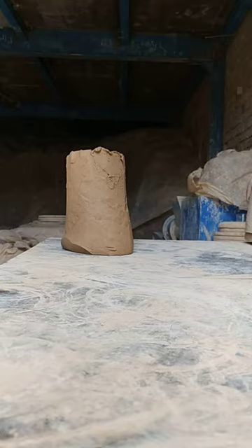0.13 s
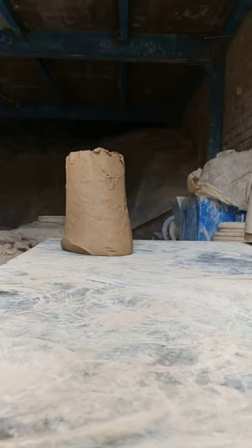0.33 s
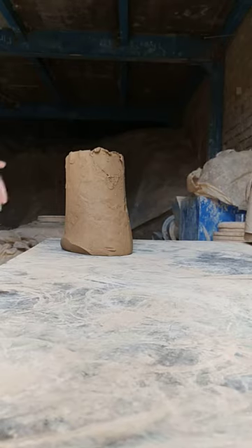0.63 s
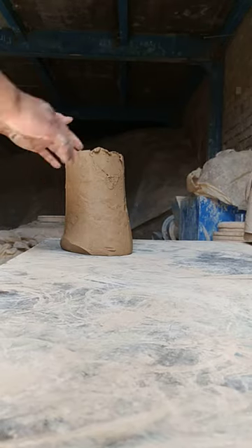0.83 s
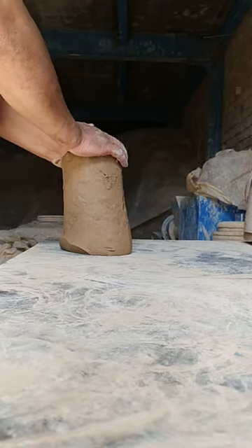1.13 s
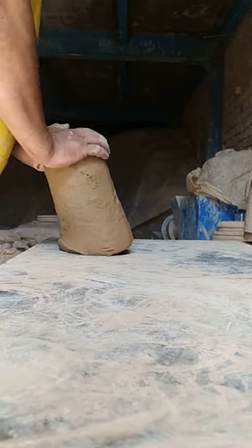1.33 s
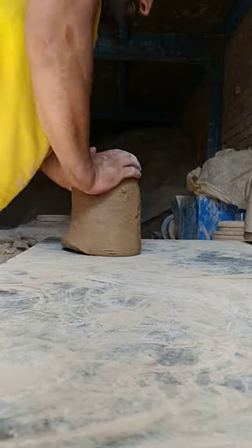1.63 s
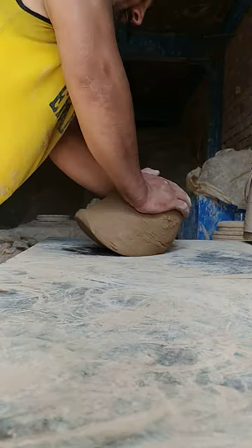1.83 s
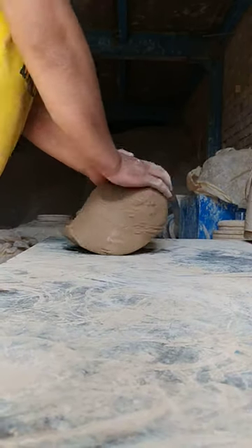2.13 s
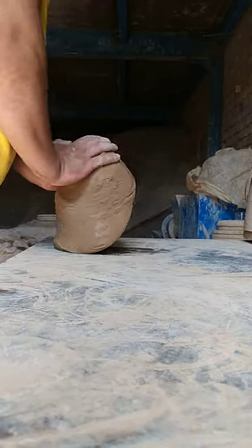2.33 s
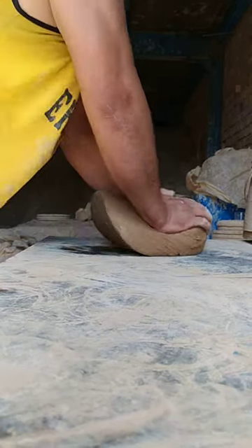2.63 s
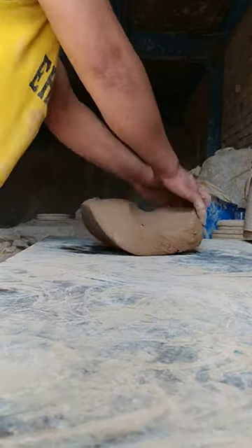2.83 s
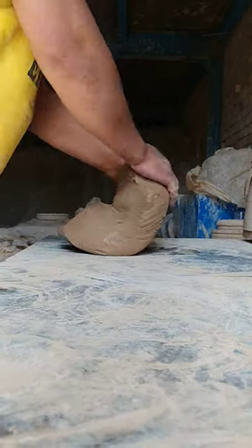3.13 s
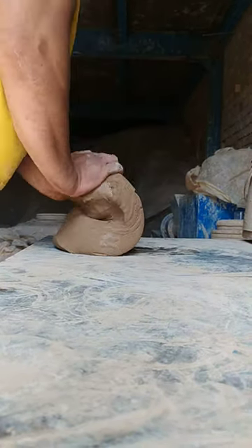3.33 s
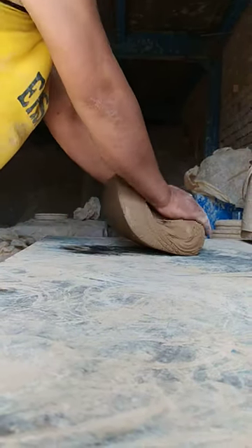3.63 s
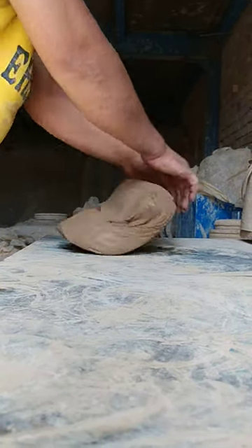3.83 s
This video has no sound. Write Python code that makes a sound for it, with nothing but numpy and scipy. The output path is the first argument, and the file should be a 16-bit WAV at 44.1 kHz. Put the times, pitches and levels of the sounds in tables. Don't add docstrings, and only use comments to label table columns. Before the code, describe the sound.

Clay being worked by hand on a table, close to a phone. Silence until 0.35 s, then a distant motor fan's low rumble, airy hiss and faint wavering tones. Soft pats at 0.9 and 1.2 s; swishes and sticky ticks around 1.8-2.2, a longer rub at 2.5-2.7, a crisp tick at 2.9. Firm snaps at 3.2, faint touches after, a last slap near 4.0. Short blurred workshop echo.

```python
import sys
import numpy as np
from scipy import signal
from scipy.fft import rfft, irfft
from scipy.io import wavfile
from scipy.ndimage import uniform_filter1d

SR = 44100
rng = np.random.default_rng(int(sys.argv[2]) if len(sys.argv) > 2 else 0)


def bounce(signal):
    frames = np.transpose(np.atleast_2d(signal))
    limited = np.clip(frames, -1, 1)
    pcm = np.round(limited * 32767).astype(np.int16)
    wavfile.write(sys.argv[1], SR, pcm)


def volts(x):
    e = np.asarray(x, float) / 20
    return 10 ** e


N = 176400


def evened(x):
    return x / np.sqrt(np.mean(x ** 2) + 1e-20)


def read(points, hz):
    f, value = np.transpose(points)
    return np.interp(np.log(hz + 1), np.log(f + 1), value)


def add(mix, start_s, sound, left_minus_right_db):
    part = mix[:, round(start_s * SR):][:, :sound.shape[-1]]
    sides = volts(np.array([[.5], [-.5]]) * left_minus_right_db)
    part += (sound * sides)[:, :part.shape[1]]


def colour(x, hz, octaves):
    port_hz, port_width_hz, port_db = 9100, 2000, 6
    roll_hz, roll_db_per_octave = 9600, -18
    f = np.fft.rfftfreq(x.shape[-1], 1 / SR) + 1
    bell = -6 * (np.log2(f / hz) / octaves) ** 2
    port = port_db / (1 + (2 * (f - port_hz) / port_width_hz) ** 2)
    roll = roll_db_per_octave * np.maximum(np.log2(f / roll_hz), 0)
    return irfft(rfft(x) * volts(bell + port + roll), x.shape[-1])


def fan():
    # pitch_hz, level_db (per Hz)
    rumble = [(12, -48), (20, -13.5), (54, -11), (81, -12), (166, -5.5), (425, -17.5), (466, -12),
              (588, -24), (800, -27), (1040, -61), (1760, -120)]
    hiss = [(350, -33), (600, -4.5), (1080, -4), (2210, -13), (2830, -9), (3520, -15), (6400, -19),
            (8510, -16.5), (15500, -30.5)]
    # pitch_hz, likeness (0 to 1)
    likeness = [(25, 0.76), (60, 0.94), (180, 0.9), (550, 0.45), (1650, 0.12), (4970, 0.0068), (15000, 0.0)]
    # pitch_hz, left_minus_right_db
    balance = [(60, 5.5), (130, -4.5), (290, 1), (640, 1), (1410, 3.5), (3100, -1), (6820, 0), (15000, 0.5)]
    # pitch_hz, width_hz, level_db, left_minus_right_db
    shed_modes = [(53, 32, -60.5, -3), (116, 11.5, -55, -5.5), (153.7, 16, -57.5, 11), (172, 14, -52.5, -8),
                  (211.4, 20, -60, 10.5), (230, 4, -63.5, 6.5), (327, 39, -73.5, -20),
                  (374.6, 36, -61, -3.5), (469.2, 10, -56.5, -2.5), (534, 49, -65, 3)]
    # pitch_hz, then for each width_hz, level_db, left_minus_right_db
    casing_hz = [1090, 2026, 2666, 2828, 2914, 3291, 4850, 4983, 8409, 8500]
    casing = [(110, -69, 1.5), (37, -80, -11.5), (24.7, -83, 15.5), (30, -70.5, 3.5), (40.3, -72, -1),
              (30, -77, 7.5), (370, -72.5, -1), (25, -81, -10), (30, -88.5, -35.5), (895, -72.5, -12)]
    # time_s, level_db
    load = [(.35, -1), (.9, -1), (1.3, 0), (2.4, 0), (3.3, 0), (3.7, 1), (4, 1)]
    rumble_db, hiss_db, split_hz = -42.5 - 3.5, -57 - 1.5, 700
    patch_db, waver_db, swell_db = 0.75, 2, .3
    size, hop = 4096, 1024
    frames, hz = N // hop + 5, np.fft.rfftfreq(size, 1 / SR)
    tones = shed_modes + [(f, *row) for f, row in zip(casing_hz, casing)]

    a, b, c, d, patches = rng.standard_normal((frames, len(hz), 5)).T
    patches = uniform_filter1d(patches, size=30, axis=0)
    patches = evened(uniform_filter1d(patches, size=4, axis=1))
    slow = rng.standard_normal((frames, len(tones) + 1))
    slow = uniform_filter1d(slow, size=6, axis=0).T * np.sqrt(6)

    low = volts(read(rumble, hz)) ** 2 * (hz < split_hz)
    high = volts(read(hiss, hz)) ** 2 * (hz >= split_hz)
    wash = low / low.sum() * volts(rumble_db) ** 2 + high / high.sum() * volts(hiss_db) ** 2
    wash = wash * volts(np.array([[1], [-1]]) * read(balance, hz))
    power = wash[:, :, None] * np.ones(frames)
    for (f, width, db, pan_db), waver in zip(tones, slow):
        line = 1 / (1 + (2 * (hz - f) / width) ** 2) ** 2
        line = (line / line.sum())[:, None] * volts(db + waver_db * waver) ** 2
        power = power + volts([[[pan_db]], [[-pan_db]]]) * line

    same = np.clip(read(likeness, hz), -1, 1)[:, None]
    left = a + 1j * b
    z = np.array([left, same * left + np.sqrt(1 - same ** 2) * (c + 1j * d)])
    plain = signal.istft(left, nperseg=size, noverlap=size - hop)[1]
    scale = np.sqrt(len(hz)) / np.std(plain)
    z *= np.sqrt(power) * volts(patch_db * patches + swell_db * slow[-1])
    load_db = np.interp(np.arange(frames) * hop / SR, *np.transpose(load))
    z *= volts((hz >= split_hz)[:, None] * load_db)
    return scale * signal.istft(z, nperseg=size, noverlap=size - hop)[1][:, :N]


def lean(length_s, db, hz):
    t = np.arange(round(length_s * SR)) / SR
    return volts(db + 1.5) * np.sin(np.pi * t / length_s) * np.sin(2 * np.pi * (hz * t + rng.random()))


def leans(air):
    # start_s, length_s, level_db, pitch_hz
    weights = [
        (.4, 0.094, -48, 52),
        (1.4, 0.22, -50, 48),
        (1.44, 0.24, -44, 172),
        (2.0, 0.17, -44.5, 178.3),
        (3.9, .08, -43, 158.2),
        (3.43, .15, -48, 176),
        (1.58, .12, -48, 150),
        (.39, .1, -50, 125),
    ]
    for start_s, length_s, db, hz in weights:
        add(air, start_s, lean(length_s, db, hz), 0)


def shed(x):
    t60_s, build_s = 0.26, 0.021
    t = np.arange(SR // 3) / SR
    tail = rng.standard_normal((2, len(t))) * volts(-60 * t / t60_s) * np.minimum(t / build_s, 1) ** 2
    return signal.fftconvolve(x, tail / np.linalg.norm(tail[0]), axes=1)[:, :N]


def tick(db, hz, octaves, cycles, tail_db):
    burst_s, tail_s = 0.00015, 0.0069
    t = np.arange(4096) / SR
    noise = rng.standard_normal((3, len(t)))
    burst = evened(colour(noise[:2] + .5 * noise[2], hz, octaves))
    shape = np.exp(-t / (burst_s + cycles / hz)) + volts(tail_db) * np.exp(-t / tail_s)
    snap = np.minimum(t * hz / 3, 1) * shape * burst
    return volts(db) * snap / abs(snap).max(axis=1)[:, None]


def skin_ticks(hands):
    # start_s, peak_db, centre_hz, width_octaves, left_minus_right_db
    ticks = [(0.902, -39, 5000, 4.1, 9), (1.17, -45.5, 3970, 1.5, 3), (1.203, -47.5, 1170, 0.51, 8),
             (1.8, -46, 3530, 2.3, 7), (1.9497, -50, 5000, 1.4, 11), (2.0325, -40.5, 4170, 1.3, 9.5),
             (2.0365, -39.5, 3600, 0.86, 9), (2.193, -43.5, 1190, 0.43, 3), (2.2167, -44.5, 7000, 1.1, 9),
             (2.5574, -50, 4340, 0.76, 8), (2.596, -44.5, 2310, 0.55, 12), (2.8751, -32, 9550, 0.82, 0.5),
             (2.877, -39.5, 3020, 1.16, 8.5), (2.8753, -51, 14500, .2, 1), (.902, -57, 13500, .2, 4),
             (3.188, -49, 13500, 0.28, -6), (3.21, -49, 13500, .2, -3)]
    for start_s, db, hz, octaves, pan_db in ticks:
        add(hands, start_s, tick(db, hz, octaves, cycles=1.2, tail_db=-19.5), pan_db)


def slaps(hands):
    # start_s, peak_db, centre_hz, width_octaves, left_minus_right_db
    hits = [(3.1862, -38, 7100, 0.26, -13), (3.187, -44, 6850, 0.44, -12), (3.1883, -31.5, 6800, 0.4, -12),
            (3.1885, -39, 5000, 0.35, -6), (3.187, -40.5, 1160, 0.76, -8), (3.208, -47, 1790, 0.56, -8),
            (3.2085, -39, 8900, 1, -8), (3.2125, -39, 9100, 0.6, 1), (3.234, -46, 8500, 2, -15),
            (3.237, -46, 9100, .5, -16), (3.4694, -44.5, 6500, 0.51, -5), (3.7608, -49.5, 1930, 0.29, -22),
            (3.9905, -42, 8000, 0.41, -11), (3.991, -35.5, 1340, 0.88, -5),
            (3.9958, -36.5, 8140, 0.18, -17), (3.997, -29.5, 2410, 1.9, -8)]
    for start_s, db, hz, octaves, pan_db in hits:
        add(hands, start_s, tick(db, hz, octaves, cycles=1.1, tail_db=-33), pan_db)


def stroke(length_s, db, hz, octaves):
    grit_db, grit_per_s, lump_db, mottle_db = .7, 10000, 1, 1.8
    skew, softness = 0.6, 1.07
    u = np.arange(round(length_s * SR)) / (length_s * SR)
    chance = rng.standard_normal((4, 8192))
    strength = volts(grit_db * np.minimum(-np.log(chance[2] % 1 + 1e-9), 5))
    slips = chance[:2] * strength * (chance[3] % 1 < grit_per_s / SR)
    lumps = volts(lump_db * evened(uniform_filter1d(chance[3], size=700)))
    z = signal.stft(colour(slips + 0.047 * slips[::-1], hz, octaves), nperseg=256)[2]
    spots = uniform_filter1d(rng.standard_normal(z.shape[1:]), size=9, axis=0)
    spots = evened(uniform_filter1d(spots, size=4, axis=1))
    rub = evened(signal.istft(z * volts(mottle_db * spots), nperseg=256)[1])
    rub = (rub * lumps)[:, :len(u)]
    return volts(db + 5) * abs(np.sin(np.pi * u ** skew)) ** softness * rub


def rub_all(hands, table, octaves):
    for start_s, length_s, db, hz, pan_db in table:
        add(hands, start_s, stroke(length_s, db, hz, octaves), pan_db)


def fingertip_rubs(hands):
    # start_s, length_s, level_db, centre_hz, left_minus_right_db
    rubs = [
        (3.62, 0.12, -67.5, 6040, -2),
        (3.61, 0.15, -67.5, 8700, -3.5),
        (1.825, .06, -61.5, 7150, 4),
        (2.1, 0.044, -65, 3700, 5),
        (2.55, 0.027, -65.5, 4350, 8),
    ]
    rub_all(hands, rubs, octaves=.2)


def squeezes(hands):
    # start_s, length_s, level_db, centre_hz, left_minus_right_db
    presses = [
        (.9, 0.11, -65, 1700, 4),
        (1.16, 0.083, -62.5, 1100, 1),
        (2.57, 0.091, -64, 2800, 1),
        (3.184, 0.08, -61, 1200, 0),
        (3.752, 0.04, -61.5, 1840, -3),
        (2.58, .04, -60, 1500, 10),
        (3.205, 0.051, -62.5, 1550, 4),
        (1.798, .022, -62.5, 3100, 4),
    ]
    rub_all(hands, presses, octaves=.45)


def palm_strokes(hands):
    # start_s, length_s, level_db, centre_hz, left_minus_right_db
    strokes = [(0.905, 0.085, -64, 5600, 5), (1.165, 0.073, -67.5, 6100, -2), (1.797, 0.042, -63, 4400, 7),
               (1.815, 0.088, -59, 6460, 2), (1.944, 0.075, -61.5, 5500, 6.5), (2.027, 0.029, -61, 3900, 7),
               (1.84, .05, -67, 2600, 1), (1.99, 0.07, -68, 4400, 9), (2.208, 0.03, -62, 7400, -1),
               (2.515, .175, -61, 2680, 5.5), (2.538, 0.17, -64, 7940, 4), (2.61, .15, -65, 3500, 1),
               (2.88, 0.078, -63, 8100, -7), (3.211, 0.084, -65.5, 8500, 7), (3.991, 0.025, -71, 4960, -3)]
    rub_all(hands, strokes, octaves=1)


def thin_out(x):
    # pitch_hz, threshold_db
    threshold = [(1000, -36), (1900, -17), (2800, -22), (3700, -9), (4900, -16), (6200, -2), (7400, -10),
                 (8600, -27), (10800, 5), (14000, 4), (14800, 28)]
    jitter_db = 8.5
    n, k = np.arange(2048), np.arange(728)
    waves = np.cos(np.pi / 1024 * np.outer(n + 512.5, k + .5))
    basis = np.sin(np.pi * (n + .5) / 2048)[:, None] * waves / np.sqrt(512)
    mid_side = np.array([[1, 1], [1, -1]]) / np.sqrt(2)
    blocks = np.pad(mid_side @ x, ((0, 0), (1024, 2048 - N % 1024))).reshape(2, -1, 1024)
    c = np.concatenate([blocks[:, :-1], blocks[:, 1:]], axis=2) @ basis
    usual = uniform_filter1d(np.median(c ** 2, axis=1), size=32, axis=1)
    usual = np.sqrt(usual * 2.2)[:, None]
    wander = uniform_filter1d(rng.standard_normal((2, c.shape[1], 73)), size=4, axis=1)
    wander = evened(wander).repeat(10, axis=2)[..., :728]
    limit = usual * volts(read(threshold, k * SR / 2048) + jitter_db * wander)
    back = (c * (abs(c) > limit)) @ basis.T
    return mid_side @ (back[:, :-1, 1024:] + back[:, 1:, :1024]).reshape(2, -1)[:, :N]


def scene():
    air, hands = fan(), np.zeros((2, N))
    leans(air)
    skin_ticks(hands)
    slaps(hands)
    fingertip_rubs(hands)
    squeezes(hands)
    palm_strokes(hands)
    return air + hands + volts(-11) * shed(hands)


def top_cut(x):
    return signal.sosfilt(signal.butter(12, 15640, fs=SR, output="sos"), x)


def record(dry):
    open_s, open_db, rise_s = .35, -10, .035
    t = np.arange(N) / SR - open_s
    fade = np.clip(t / .002, 0, 1) * volts(open_db * np.clip(1 - t / rise_s, 0, 1) ** 2)
    return top_cut(thin_out(dry) * fade)


dry = scene()
out = record(dry)
bounce(out)
```